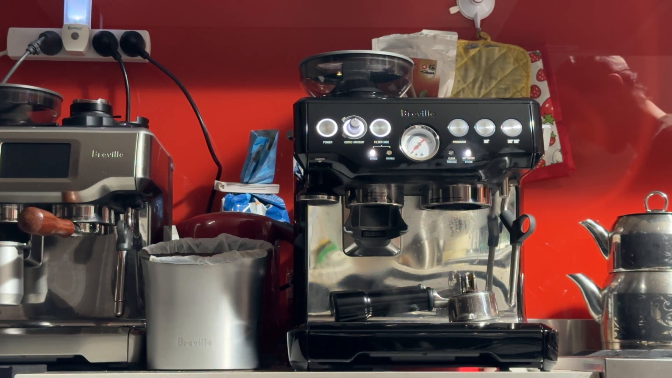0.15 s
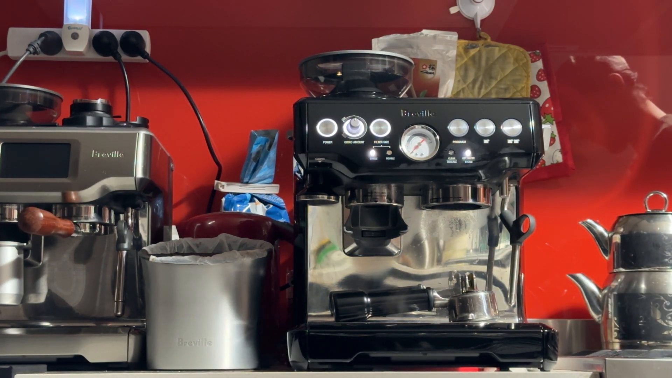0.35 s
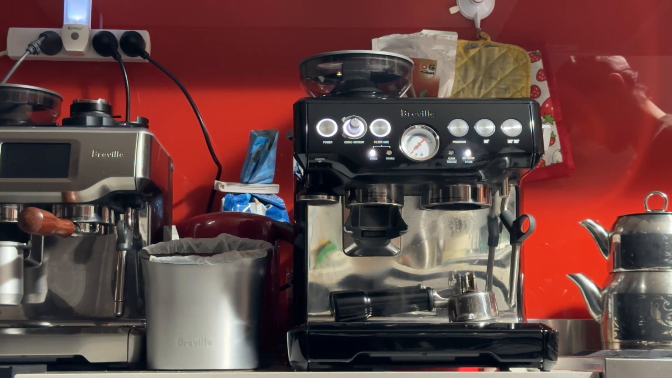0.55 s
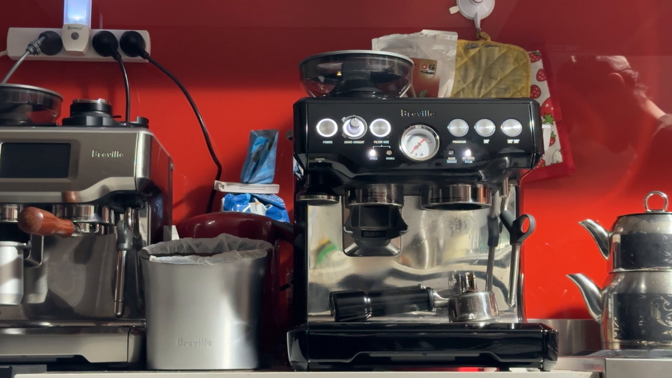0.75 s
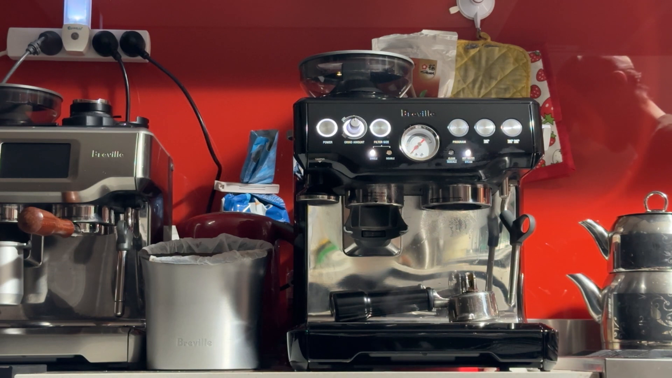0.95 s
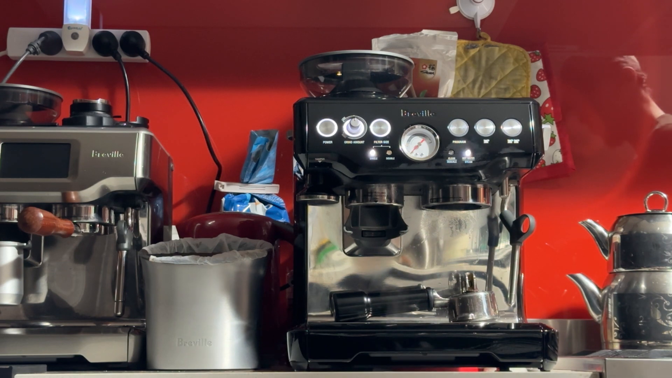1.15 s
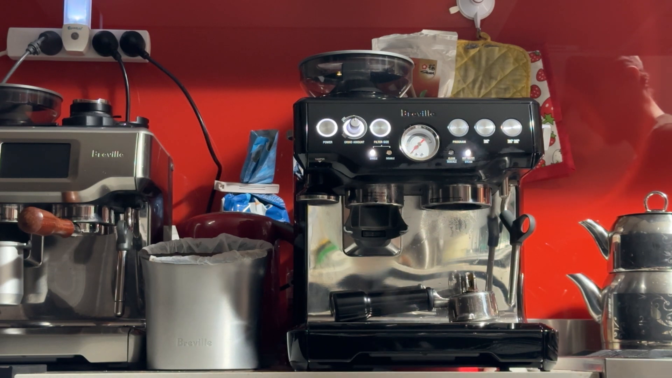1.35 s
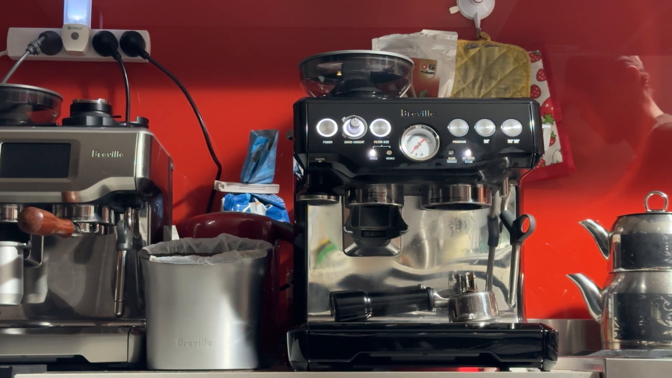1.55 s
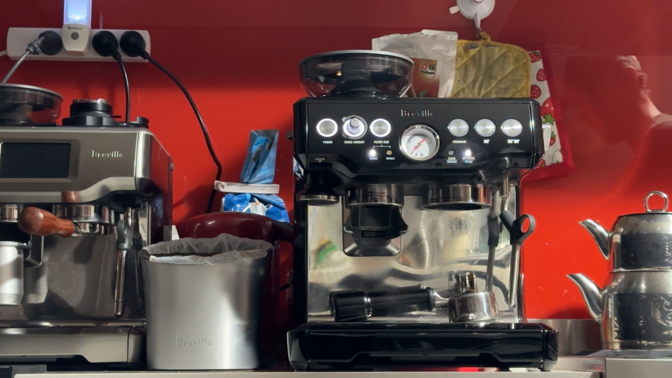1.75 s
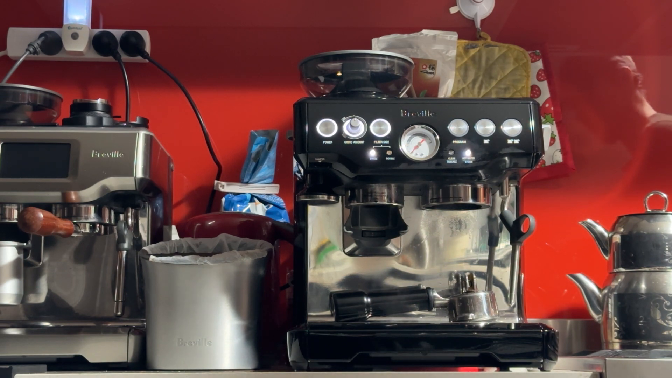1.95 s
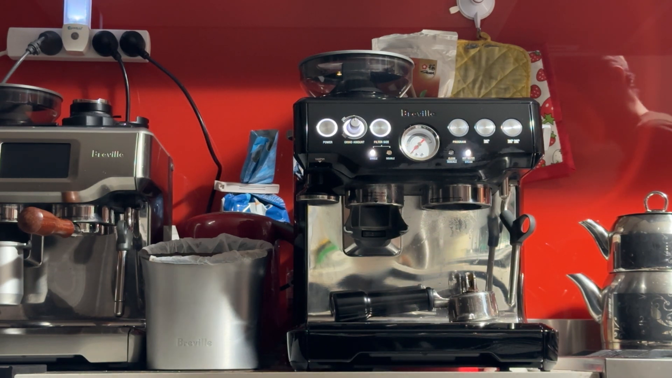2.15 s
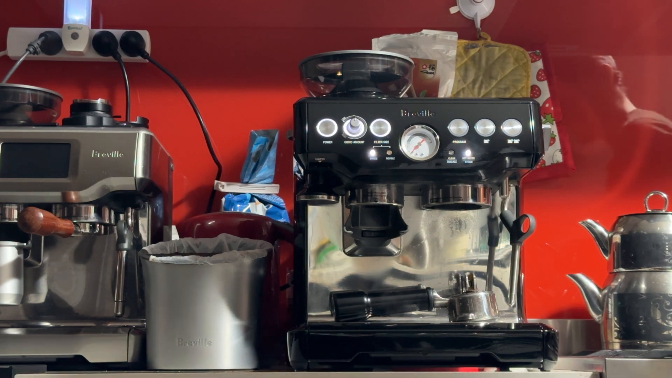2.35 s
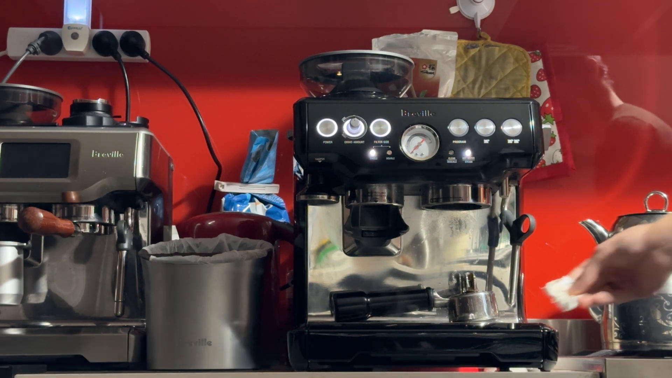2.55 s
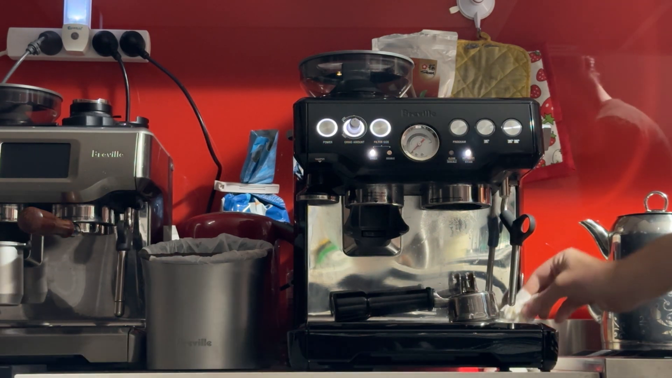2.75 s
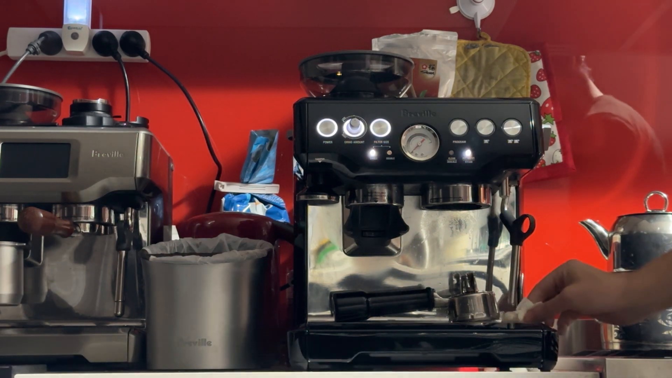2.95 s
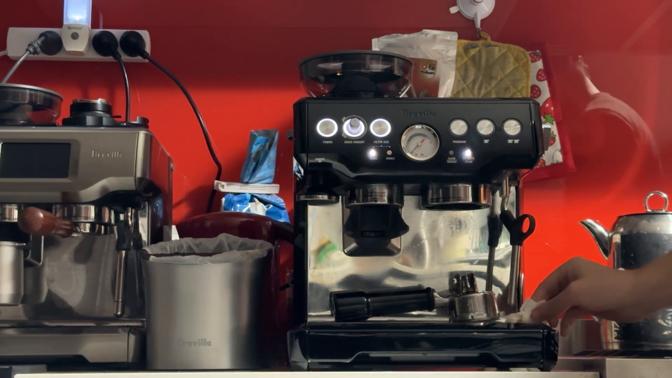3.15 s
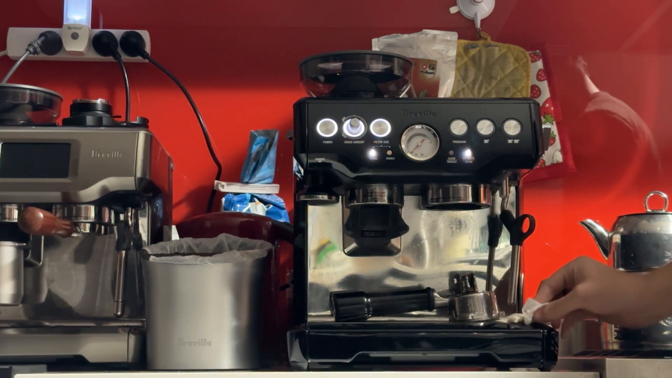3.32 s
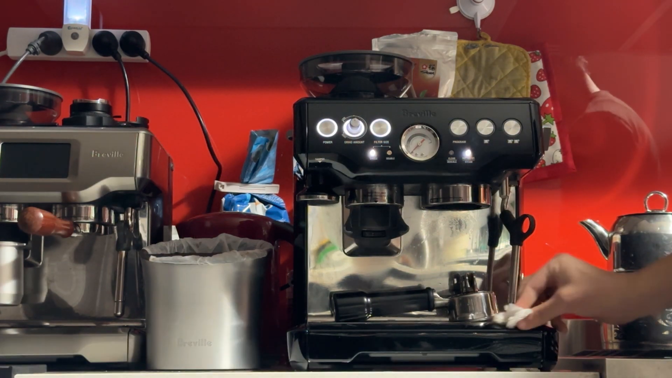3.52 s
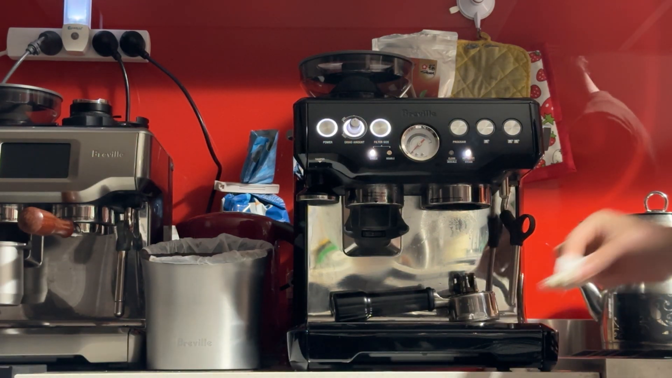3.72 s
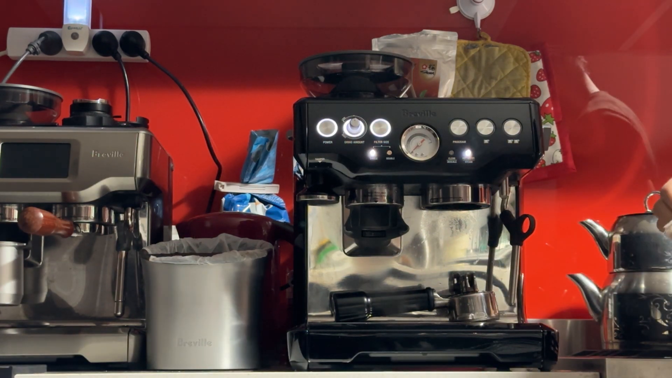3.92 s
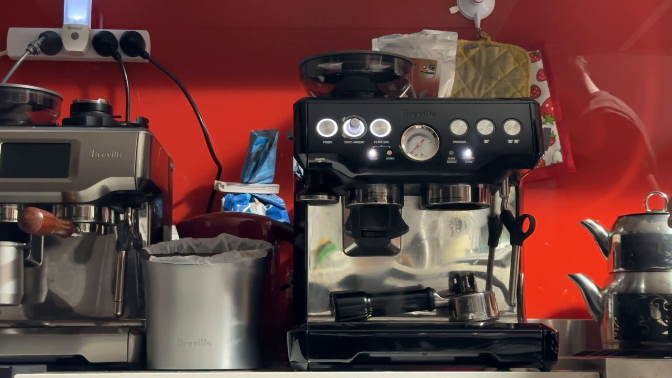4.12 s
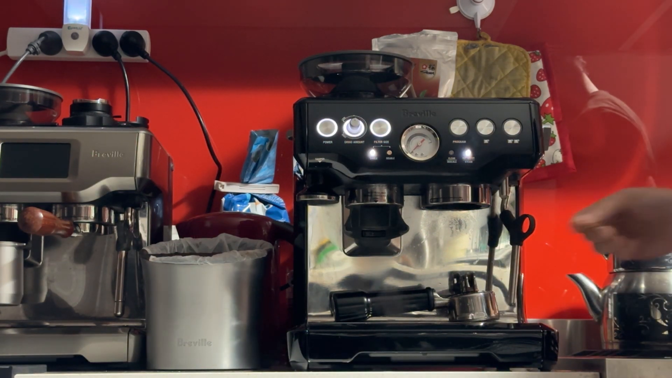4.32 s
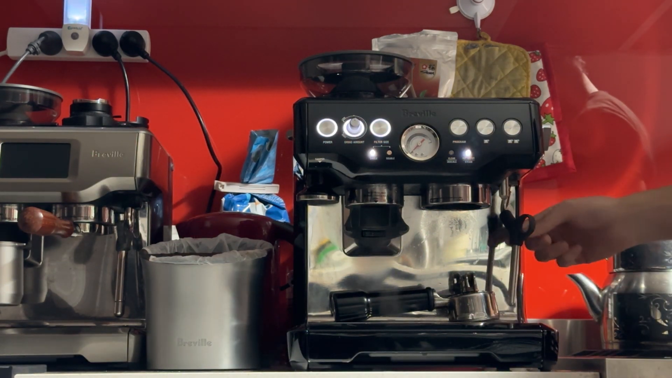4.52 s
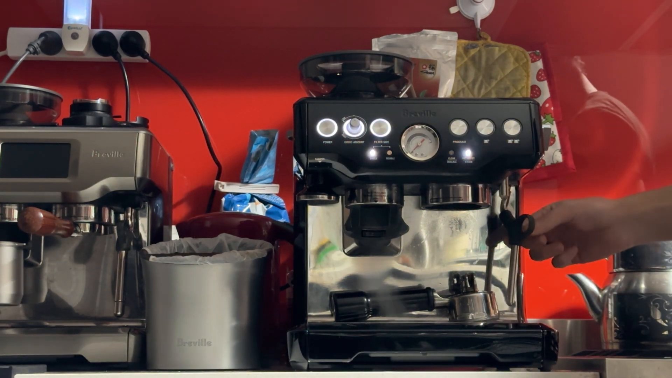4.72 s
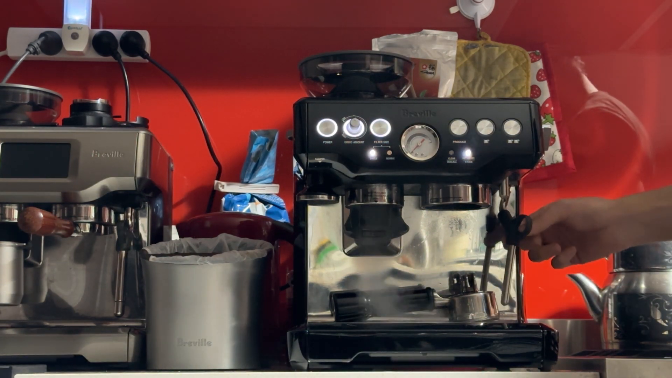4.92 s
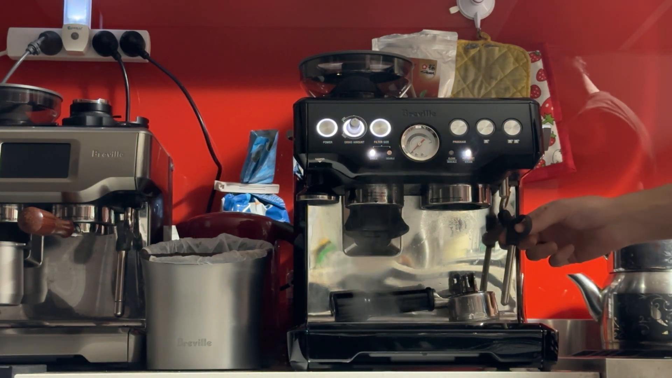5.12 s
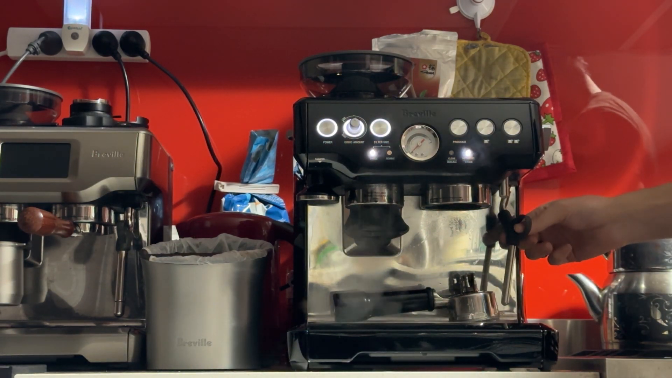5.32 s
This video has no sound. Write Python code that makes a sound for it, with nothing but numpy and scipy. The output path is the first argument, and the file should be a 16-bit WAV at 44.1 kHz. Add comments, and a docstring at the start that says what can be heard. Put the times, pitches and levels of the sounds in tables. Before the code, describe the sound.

Close in a quiet, hard-walled kitchen, an espresso machine clicks once, then its pump knocks about twice a second, rattling the casing. A second click comes amid a soft cloth dab and wipe on the drip tray. A faint sizzle grows, then the steam valve opens with a puff; wet gurgling gives way to a climbing, bright hiss. The stereo microphones face it straight on.

```python
"""Espresso machine starting to steam

An espresso machine on a kitchen counter, straight ahead of two microphones: its pump gives single strokes, about
two a second, as contacts that ring the casing and panels; two relay clicks ring their housing.
A cloth brushes the drip tray as swells of noise. Then the valve opens: the wand sputters wetly in fluttering noise,
and its hiss sweeps upward through a climbing resonance as the water is driven out."""
import sys
import numpy as np
from scipy import signal
from scipy.fft import rfft, irfft
from scipy.io import wavfile

SR = 44100
rng = np.random.default_rng(int(sys.argv[2]) if len(sys.argv) > 2 else 0)


def master_out(mix):
    """Clip the mix to full scale and print it as 16-bit PCM to the path in sys.argv[1]."""
    frames = np.transpose(np.atleast_2d(mix))
    ceiling = np.clip(frames, -1, 1)
    pcm = np.round(ceiling * 32767).astype(np.int16)
    wavfile.write(sys.argv[1], SR, pcm)


N = 241427
TIME = np.arange(N) / SR
BINS_HZ = np.maximum(np.arange(N // 2 + 1) * SR / N, 1)
VALVE_OPENS_S = 4.542


def from_db(db):
    """Decibels to gain."""
    return 10 ** (np.asarray(db) / 20)


def rms_one(x):
    """Scale to rms 1."""
    return x / np.sqrt(np.mean(x ** 2) + 1e-20)


def over_hz(points):
    """A table over frequency, read at every FFT bin along a logarithmic axis."""
    hz, value = np.transpose(points)
    return np.interp(np.log(BINS_HZ), np.log(hz), value)


def noise(spectrum):
    """Coloured stereo noise of rms 1: a shared middle plus a diffuse side, opposite at the two microphones."""
    # diffuse share between the microphones: (frequency [Hz], side over middle [dB])
    side_width = [(50, -16), (110, -15.5), (220, -11.5), (450, -6), (1000, -4), (1500, -11.5), (2300, -31),
                  (5500, -24), (9000, -59)]
    mid_db = over_hz(spectrum)
    side_db = mid_db + over_hz(side_width)
    white = rfft(rng.standard_normal((2, N)))
    mid, side = irfft(white * from_db([mid_db, side_db]), N)
    return rms_one(np.array([mid + side, mid - side]))


def flutter(rate_hz, depth_db):
    """A gain that wanders at random, slower than about rate_hz, by depth_db rms."""
    slow = rfft(rng.standard_normal(N)) / (1 + (BINS_HZ / rate_hz) ** 2)
    return from_db(depth_db * rms_one(irfft(slow, N)))


def swing(crest_s, period_s, depth_db):
    """A gain that rises and falls regularly."""
    return from_db(depth_db * np.cos(2 * np.pi * (TIME - crest_s) / period_s))


def ramp(start_s, length_s):
    """Rises from 0 to 1, then holds."""
    return np.clip((TIME - start_s) / length_s, 0, 1)


def dying(t60):
    """A decay from time zero, 60 dB down after t60 seconds."""
    return np.exp(-np.log(1000) * TIME / t60)


def clicks(times, levels_db):
    """Single impulses."""
    out = np.zeros(N)
    at = np.clip(np.round(times * SR).astype(int), 0, N - 1)
    out[at] = from_db(levels_db)
    return out


def soften(x, cut_hz):
    """Second-order low-pass."""
    low_pass = signal.butter(2, min(cut_hz, SR / 2 - 100), fs=SR, output="sos")
    return signal.sosfilt(low_pass, x + 1e-18)


def band(x, low_hz, high_hz):
    """Second-order edges on both sides."""
    low_cut = signal.butter(2, low_hz, "high", fs=SR, output="sos")
    return signal.sosfilt(low_cut, soften(x, high_hz))


def resonate(x, hz, width_hz):
    """A resonance with gain 1 at its top."""
    r = np.exp(-np.pi * width_hz / SR)
    feedback = [1, -2 * r * np.cos(2 * np.pi * hz / SR), r * r]
    return signal.lfilter(np.array([1, 0, -1]) * (1 - r * r) / 2, feedback, x)


def ring(force, modes):
    """Every mode rings as a dying wave, neighbours in opposite sense."""
    out = 0
    for k, (hz, db, t60) in enumerate(modes):
        r = from_db(-60 / (t60 * SR))   # decay per sample
        w = 2 * np.pi * hz / SR
        wave = signal.lfilter([.5, 0, -.5], [1, -2 * r * np.cos(w), r * r], force + 1e-18)
        out = out + (-1) ** k * from_db(db) * wave
    return out


def convolve(x, response):
    """Pass a mono sound through the first half second of a stereo response."""
    return signal.fftconvolve(x[None], response[:, :SR // 2], axes=1)[:, :N]


def counter(x, count=14, echo_db=-6.5):
    """Early echoes off wall, tray and counter comb the spectrum of a steady sound; rms 1."""
    delays = rng.uniform(.0015, .022, count)
    signs = rng.choice([-1, 1], count)
    echoes = sum(sign * np.roll(x, int(delay * SR), axis=-1) for delay, sign in zip(delays, signs))
    return rms_one(x + from_db(echo_db) * echoes / np.sqrt(count))


def kitchen(x, t60=.6):
    """Diffuse reflections of a small hard room: dying noise from 4 ms on."""
    tail = noise([(60, -31), (200, -3), (16000, 5.5)]) * dying(t60) * (TIME > .004)
    return convolve(x, tail / np.sqrt(np.sum(tail ** 2) / 2))   # unit energy per microphone on average


def ambience(level_db=-51.5, hum_hz=95.7, hum_db=-66):
    """The quiet kitchen: low room rumble and a thin hiss as shaped noise, with a low hum as a wavering sine."""
    # room noise: (frequency [Hz], level per hertz [dB])
    room_spectrum = [(20, -18), (40, -3), (55, -3.5), (78, 0), (95, 2), (125, -7), (200, 1.5), (300, -8.5),
                     (500, -11), (950, -22), (1900, -23.5), (2700, -21.5), (3800, -22), (5400, -16.5),
                     (7500, -17.5), (11500, -16), (15000, -12)]
    hum = from_db(hum_db) * np.sin(2 * np.pi * hum_hz * TIME) * flutter(3.6, 0.5)
    return from_db(level_db) * counter(noise(room_spectrum)) + hum


def boiler(start_s=3.45, rise_s=0.67, level_db=-56):
    """A faint sizzle grows as the water nears the boil, shortly before the steam comes."""
    # sizzle of the boiler: (frequency [Hz], level per hertz [dB])
    sizzle_spectrum = [(1000, -13.5), (3500, -7.5), (5400, 2), (7500, -4), (15000, 0)]
    return from_db(level_db) * ramp(start_s, rise_s) * noise(sizzle_spectrum)


def relay(bounce_s=0.00111, bounce_db=-6, snap_db=-32, snap_t60=0.010, tail_db=-44, tail_t60=0.33):
    """The contact snaps and bounces once; the housing and the room ring on."""
    # the clicks: (time [s], level [dB])
    relay_clicks = [(0.259, -0.5), (2.906, -1.5)]
    # resonances of the housing: (frequency [Hz], level [dB], t60 [s])
    housing_modes = [(1526, -50, 0.15), (2410, -51, 0.05), (4050, -37, 0.053), (5060, -32, 0.0085),
                     (6560, -36.5, 0.0092)]
    # colour of the snap: (frequency [Hz], level per hertz [dB])
    snap_spectrum = [(150, -27), (350, 0), (550, 4), (1050, -9), (1600, -4), (2500, -6), (4200, -0.5),
                     (7000, -3), (10500, -4.5), (16000, -15)]
    at, db = np.transpose(relay_clicks)
    force = clicks(at, db) + clicks(at + bounce_s, db + bounce_db)
    decay = from_db(snap_db) * dying(snap_t60) + from_db(tail_db) * dying(tail_t60)
    return convolve(force, noise(snap_spectrum) * decay) + ring(force, housing_modes)


def cloth():
    """Each touch swells and fades; fibres catch unevenly on the tray."""
    # a dab and a wipe: (middle [s], length [s], level [dB])
    touches = [(2.694, 0.039, -54.5), (3.094, 0.87, -65)]
    # rubbing of the cloth: (frequency [Hz], level per hertz [dB])
    rub_spectrum = [(400, -11), (2050, -12), (2400, 2), (2900, -8), (6000, -8), (9000, -15), (15000, -19)]
    pressure = 0
    for middle, length, db in touches:
        swell = np.sin(np.pi * ramp(middle - length / 2, length)) ** 2
        pressure = pressure + from_db(db) * swell
    return pressure * flutter(60, 0.91) * noise(rub_spectrum)


def pump(level_db=-2.0, jitter_s=.0005, uneven_db=1.47, rattle_db=-45.5, rattle_t60=0.18,
         room_db=-10, panel_room_db=-5, scrape_db=-17):
    """Each stroke is a run of contacts, bright early and deep at the end, that shakes the casing."""
    # contacts as the plunger chatters and lands: (delay [s], level [dB], lowest [Hz], highest [Hz])
    contacts = [(-.004, 5, 222, 373), (.001, -4, 700, 5500), (.0065, 9, 730, 960), (.011, -6.5, 600, 7000),
                (.016, -2, 200, 1110), (.022, 0.5, 160, 2010), (.025, 6, 35, 650), (.031, 6.5, 44.5, 332)]
    # resonances of casing and counter: (frequency [Hz], level [dB], t60 [s])
    casing_modes = [(51, -49.5, 0.46), (69, -43, 0.17), (91.8, -46, 0.32), (131.1, -57, 0.2),
                    (205.4, -51, 0.24), (223.4, -46.5, 0.14), (252, -50, 0.19), (325, -53.5, 0.099),
                    (378, -58.5, 0.12), (400.6, -63.5, 0.13), (468.7, -53, 0.23), (570, -51.5, 0.17),
                    (714, -56, 0.066), (739, -50.5, 0.086), (808, -65.5, 0.18), (869, -53, 0.09),
                    (910, -52.5, 0.12), (1200, -60, 0.15), (1495, -61, 0.1)]
    # loose panels rattling: (frequency [Hz], level per hertz [dB])
    rattle_spectrum = [(130, -5), (250, 6), (550, 1.5), (880, 5), (1050, -3), (1500, -4), (1950, -5.5),
                       (2450, 0.5), (3400, -9), (5200, -2), (8000, -7.5), (15000, -46)]
    first_s, period_s, count = .6493, .5204, 10   # a steady pace
    first_extra_db, settle_s = 1.1, 0.51   # the strokes soften as pressure builds
    travel_s = 0.024   # the plunger's travel time

    stroke = np.arange(count)
    start = first_s + period_s * stroke
    stroke_db = level_db + first_extra_db * np.exp(-(start - first_s) / settle_s)
    loose_db = 5 * (stroke == 1)   # the second stroke shakes the panels hardest
    force = 0
    for delay, db, low_hz, high_hz in contacts:
        late, strong = rng.standard_normal((len(start), 2)).T
        hits = clicks(start + delay + jitter_s * late, stroke_db + db + uneven_db * strong)
        force = force + band(hits, low_hz, high_hz)
    # the plunger scrapes along its bore while it travels
    travel = np.sin(np.pi * np.minimum(TIME[:SR // 2] / travel_s, 1))
    moving = signal.fftconvolve(clicks(start, stroke_db), travel)[:N]
    scrape = moving * band(rng.standard_normal(N), 500, 6000) / np.sqrt(travel_s * SR / 2)
    force = force + from_db(scrape_db) * scrape
    body = ring(force, casing_modes)
    # the thin panels have too many modes to tell apart
    panel_force = force * from_db(rattle_db + np.interp(TIME, start, loose_db))
    panels = convolve(panel_force, noise(rattle_spectrum) * dying(rattle_t60))
    room = kitchen(from_db(room_db) * body + from_db(panel_room_db) * panels.mean(axis=0))
    return body + panels + room


def bubbling(peak_s=4.70, level_db=-44.5, rise_db_per_s=35, drying_db_per_s=11.5):
    """Slugs of water gurgle through the wand, weaker as it dries; one hollow knock rings in it."""
    # bubbling water: (frequency [Hz], level per hertz [dB])
    wet_spectrum = [(350, -19), (600, -12.5), (760, -7), (950, -8.5), (1250, 0), (1600, -1), (1950, -12.5),
                    (2800, -38)]
    past_peak = TIME - peak_s
    water_db = level_db + np.minimum(rise_db_per_s * past_peak, -drying_db_per_s * past_peak)
    slugs = from_db(water_db) * swing(peak_s, period_s=0.237, depth_db=2.5)
    knock = ring(clicks(np.array([4.826]), 0), [(730, -35.5, 0.1)])   # one mode: Hz, dB, t60 in s
    return counter(noise(wet_spectrum)) * slugs * flutter(42, 1.7) + knock


def nozzle(level_db=-51, relative_width=0.39, size=32):
    """Turbulence passes twice through a climbing resonance, for steep sides; it surges as the nozzle clears."""
    # the resonance climbs as the nozzle clears: (time [s], frequency [Hz])
    climb = [(4.80, 1400), (4.95, 1630), (4.99, 2300), (5.11, 2850), (5.22, 4050), (5.29, 5960),
             (5.303, 11300), (5.318, 12200), (5.335, 15010)]
    clears_s, surge_db, surge_rise_s, surge_fall_s = 5.302, -27, 0.014, 0.049   # the last water leaves
    hz = np.interp(TIME, *np.transpose(climb))
    out, state = np.zeros(N), np.zeros((2, 2))
    white = counter(rng.standard_normal(N)) * flutter(70, 1.0)
    for i in range(int(VALVE_OPENS_S * SR), N, size):
        width = relative_width * hz[i]
        r = np.exp(-np.pi * width / SR)
        section = [(1 - r * r) / 2, 0, (r * r - 1) / 2, 1, -2 * r * np.cos(2 * np.pi * hz[i] / SR), r * r]
        block, state = signal.sosfilt([section, section], white[i:i + size], zi=state)
        out[i:i + size] = block * np.sqrt(2 * SR / (np.pi * width))   # same power at any width
    surge = np.exp(np.minimum((TIME - clears_s) / surge_rise_s, (clears_s - TIME) / surge_fall_s))
    soft_onset = ramp(4.81, 0.071)
    sputter = soft_onset * swing(crest_s=5.28, period_s=0.1176, depth_db=5.5)
    return out * (from_db(level_db) * sputter + from_db(surge_db) * surge)


def steam(treble_hz=9800, opening_s=0.0051, puff_db=-39, puff_t60=0.11):
    """The valve opens with a puff; the dry hiss swells while the bubbling dies away and the nozzle clears."""
    # dry steam: (frequency [Hz], level per hertz [dB])
    hiss_spectrum = [(60, -18), (150, -6.5), (450, -9), (750, -4), (1700, -3.5), (2400, -2.5), (3200, 0),
                     (4000, -0.5), (6500, 1.5), (8500, 3), (11000, 1.5), (14000, 7.5), (16000, 2)]
    # resonances of wand and drip tray: (frequency [Hz], width [Hz], level over the hiss [dB])
    wand_modes = [(2320, 75, -0.5), (4230, 320, -4), (5360, 200, -2), (7000, 320, -8), (9940, 300, -0.5)]
    since = np.maximum(TIME - VALVE_OPENS_S, 0)
    hiss_db = -37 + 5 * ramp(VALVE_OPENS_S, 0.65)   # swells as the wand heats, then holds
    treble_db = -1.5 + 7.5 * np.exp(-since / 0.11)   # the first spray is brighter
    jet = counter(noise(hiss_spectrum))
    resonances = sum(from_db(db) * resonate(jet, hz, width) for hz, width, db in wand_modes)
    jet = rms_one(jet + resonances)
    treble = irfft(rfft(jet) / (1 + (treble_hz / BINS_HZ) ** 8), N)
    jet = jet + treble * (from_db(treble_db) - 1)
    jet = jet * from_db(hiss_db) * flutter(60, 0.6)
    puff = noise([(80, -12), (270, 3), (600, -11), (2000, -16), (8000, -32)])
    puff = from_db(puff_db) * puff * np.exp(-np.log(1000) * since / puff_t60)
    return (jet + bubbling() + nozzle() + puff) * ramp(VALVE_OPENS_S, opening_s)


def scene():
    """Everything stands straight ahead of the microphones."""
    return pump() + relay() + cloth() + boiler() + steam() + ambience()


def record(dry, low_cut_hz=46, top_hz=15900):
    """Left and right are turned apart in phase across the treble; deep bass and the top are cut."""
    # phase between left and right: (frequency [Hz], phase [rad])
    stereo_phase = [(2100, 0), (3300, -.42), (7650, 0), (8350, -3.14), (9480, -3.14), (10700, -.2),
                    (11600, .2), (13170, 3.14), (13650, 3.14), (15250, 6)]
    low_cut = 1 / np.sqrt(1 + (low_cut_hz / BINS_HZ) ** 8)
    turn = np.exp(1j * over_hz(stereo_phase) / 2 * np.array([[1], [-1]]))
    fade_out = np.minimum((N - np.arange(N)) / 64, 1)   # over the last 64 samples
    channels = irfft(rfft(dry * fade_out) * low_cut * turn, N)
    top_cut = signal.ellip(12, .1, 80, top_hz, fs=SR, output="sos")
    return signal.sosfilt(top_cut, channels)


dry = scene()
out = record(dry)
master_out(out)
```